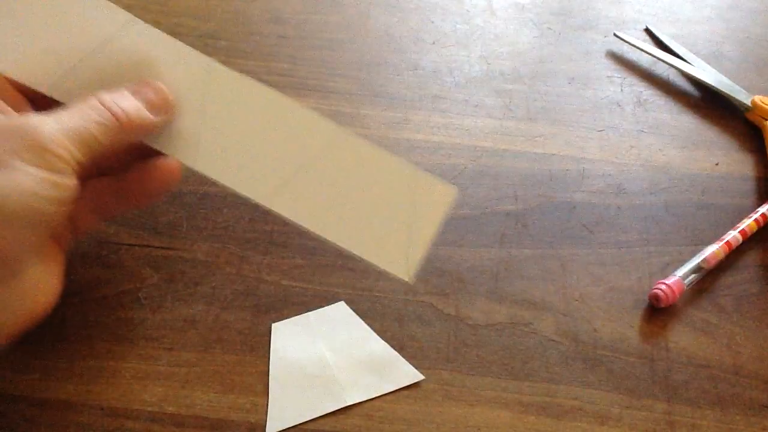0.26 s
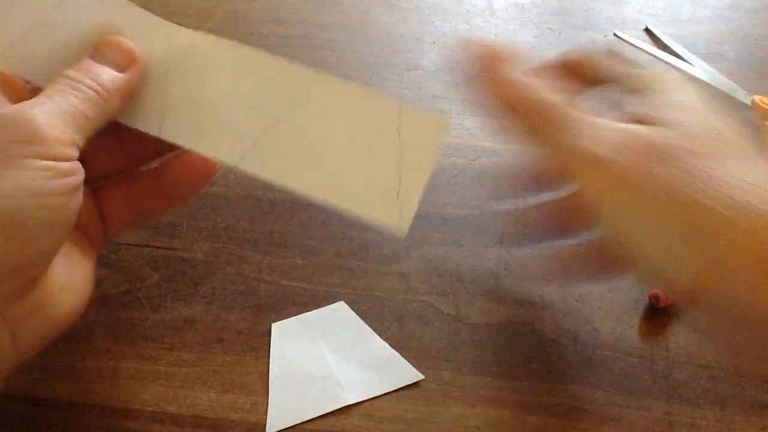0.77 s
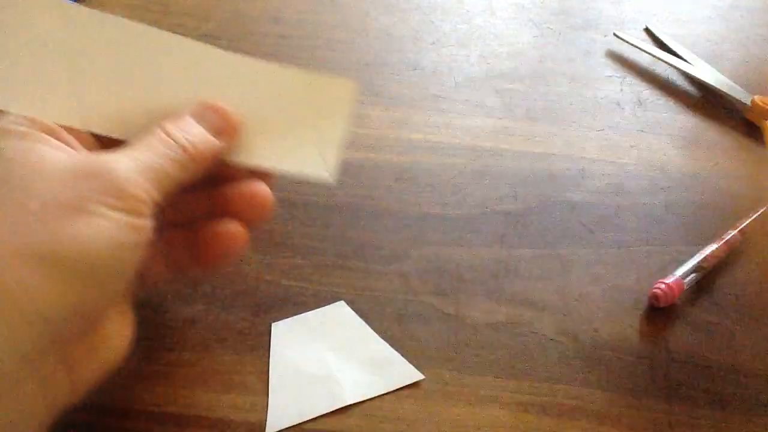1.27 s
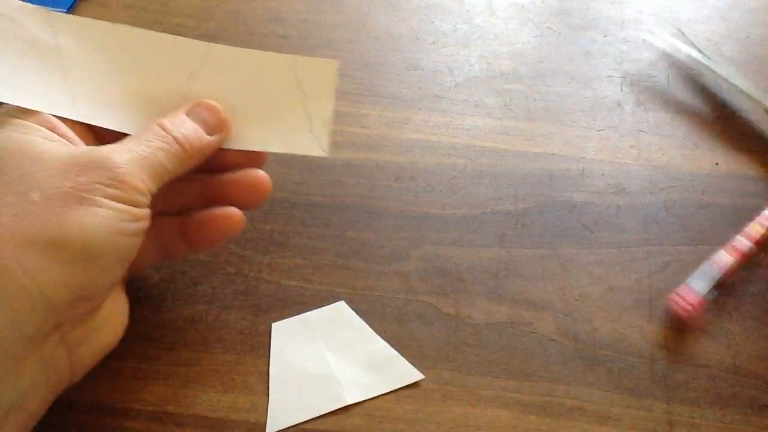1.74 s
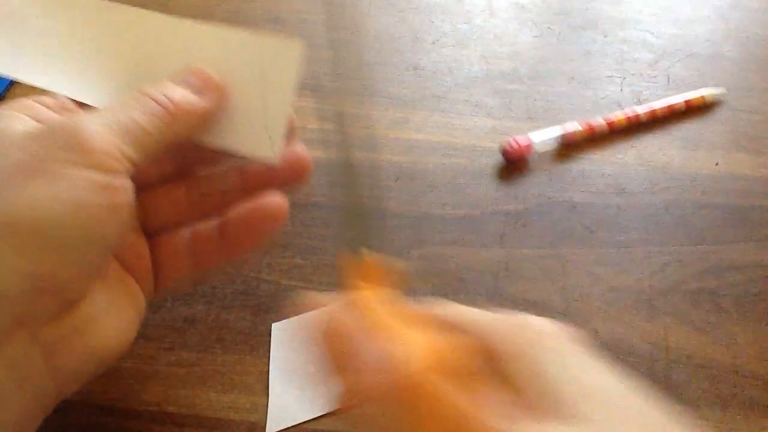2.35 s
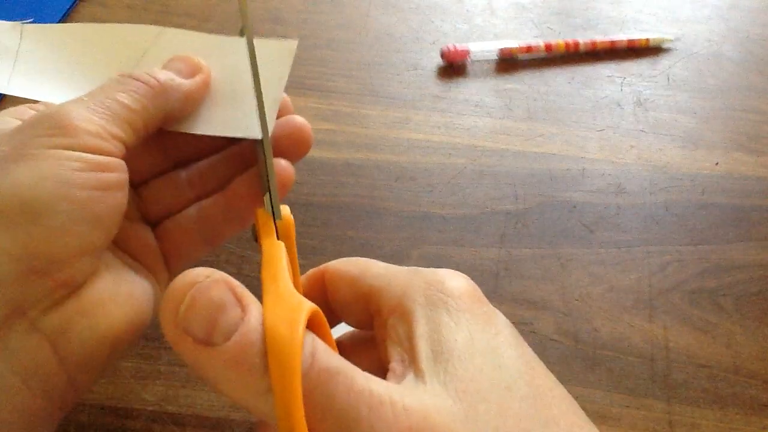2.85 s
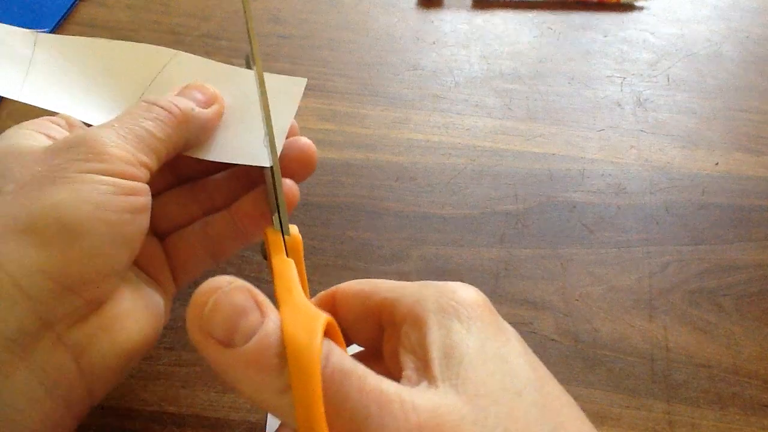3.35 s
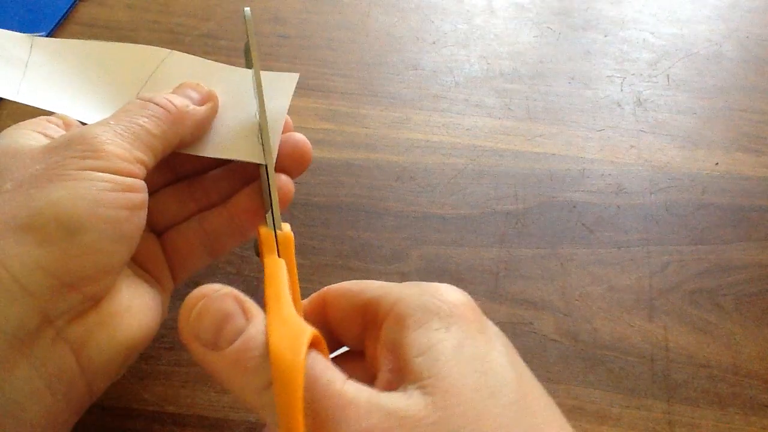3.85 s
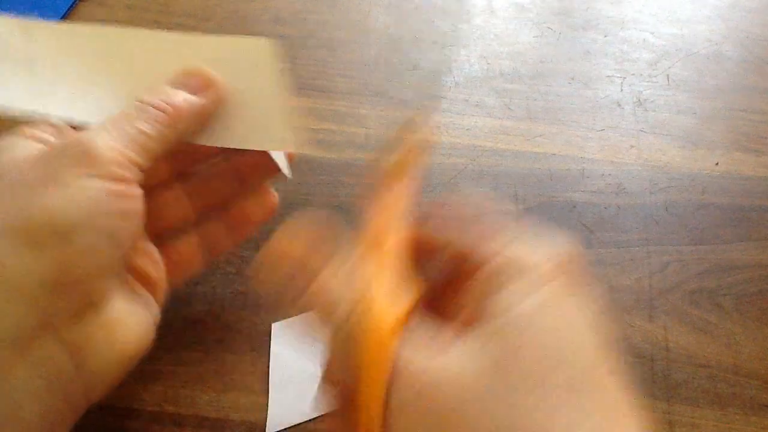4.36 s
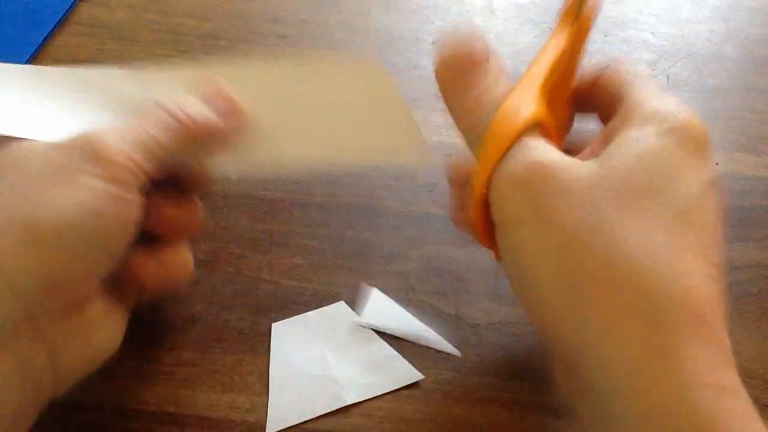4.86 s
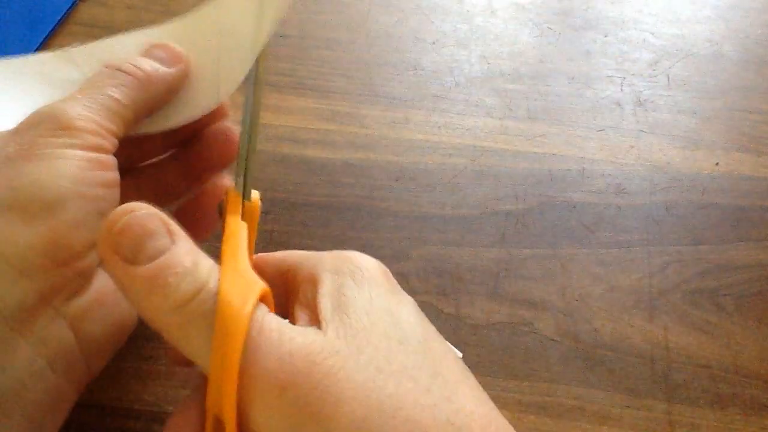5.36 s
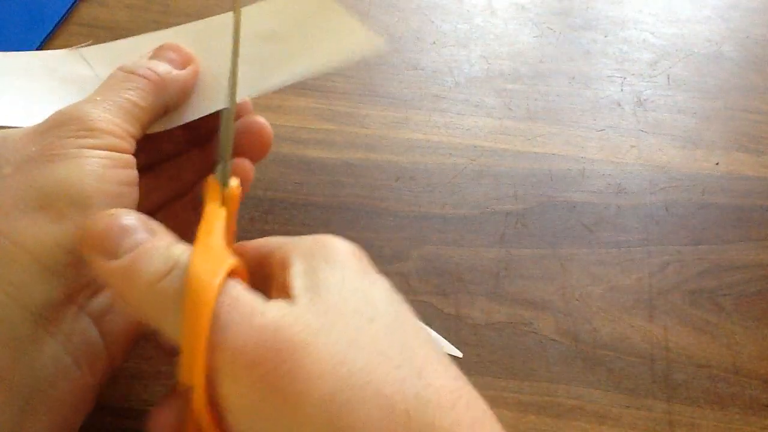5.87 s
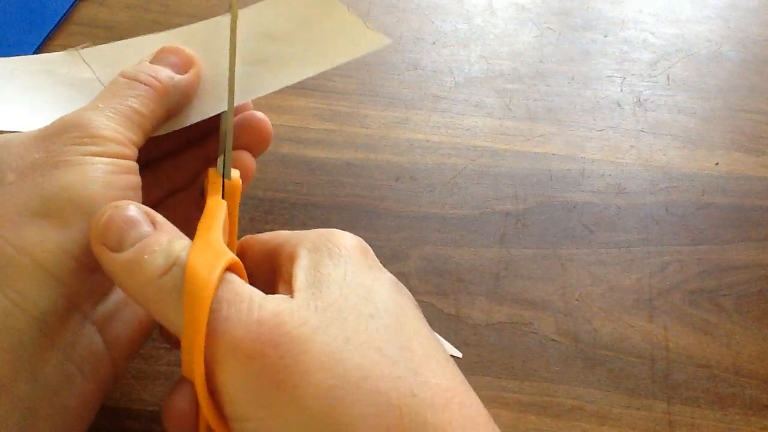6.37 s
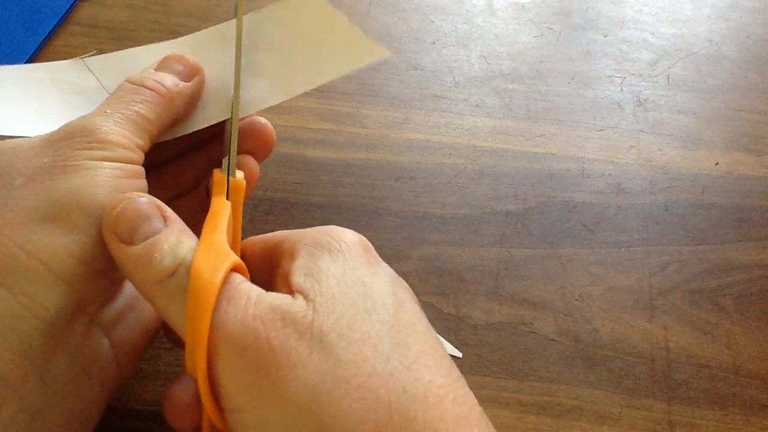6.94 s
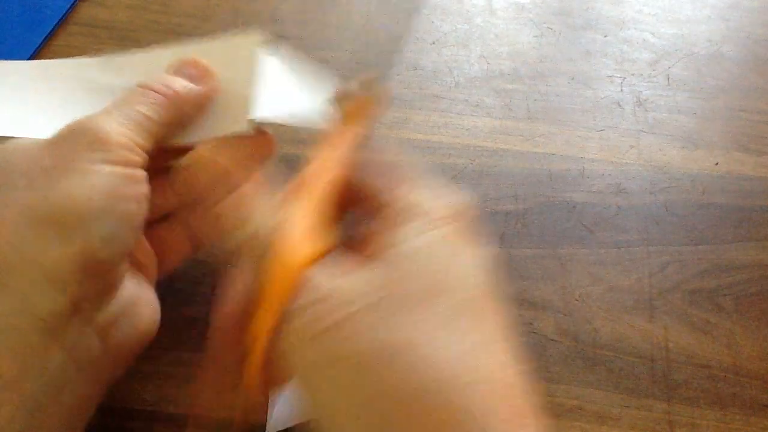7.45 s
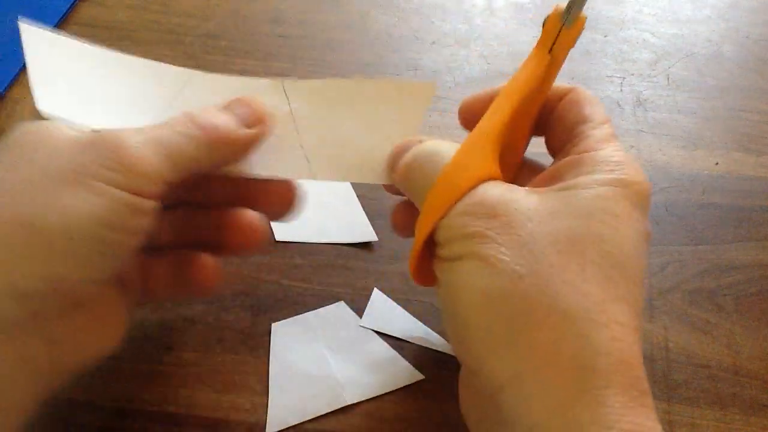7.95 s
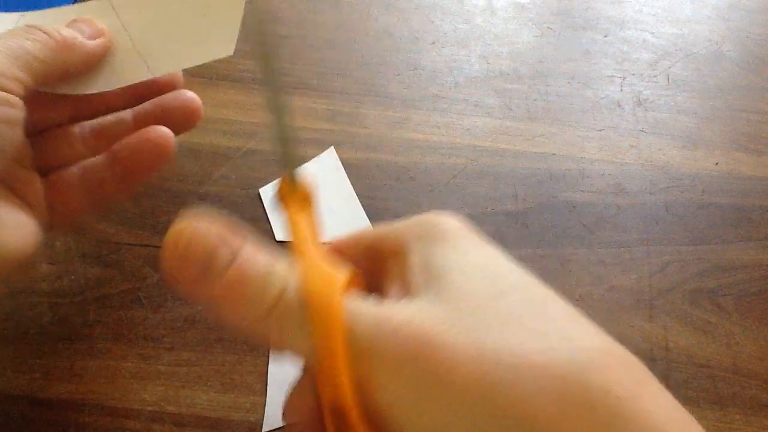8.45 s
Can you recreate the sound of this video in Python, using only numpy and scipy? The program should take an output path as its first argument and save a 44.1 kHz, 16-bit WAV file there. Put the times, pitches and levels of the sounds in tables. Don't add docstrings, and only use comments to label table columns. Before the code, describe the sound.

A close mono microphone hears a quiet room with soft ventilation, faint mains buzz and barely audible appliance drones. From 0 to 0.6 s a stiff paper strip rustles, flexes and snaps in the fingers. Around 1.0-1.2 s come short slips and two sharp knocks on the wooden table. At 1.6 s tools clack, and at 1.8 s the loudest hard, bright, metallic clatter rings the tabletop, with smaller taps and dragging until about 2.5 s. Near silence follows. From 3.6 to 4.5 s blades slowly shear paper, with thin crackles growing to a crisp hiss at 4.2 s. Soft swishes and rubbing run to 5.8 s, with a modest knock at 5.3 s. A lull, then faint crackles from 6.8 s lead to the second cut, closing at 7.28 s with a brief falling squeak and snip. Papery wipes follow, a light tick and rustle at 8.15 s, then a faint lingering hiss.

```python
import sys
import numpy as np
from scipy import signal
from scipy.fft import rfft, irfft
from scipy.io import wavfile

SR = 44100
rng = np.random.default_rng(int(sys.argv[2]) if len(sys.argv) > 2 else 0)


def rack_gain(trim_db):
    fader = np.asarray(trim_db, float)
    return 10 ** (fader / 20)


def unload_wav(signal):
    wavfile.write(
        sys.argv[1],
        SR,
        np.round(np.clip(np.atleast_2d(signal).T, -1, 1) * 32767).astype(np.int16),
    )


N = 384111

# freq_hz, density_db_per_hz
AIR_SPECTRUM = [(20, -55), (60, -34), (95, -21.5), (125, -22), (200, -8), (240, -7.5), (280, -8),
                (360, -11.5), (450, -12.5), (700, -9.5), (1150, -14), (1600, -20), (2300, -24.5),
                (15300, -28)]
AIR_DB = -59
# freq_hz, level_db_rms
HUM_LINES = [(120.1, -68.5), (240.3, -67), (360.4, -75), (630, -77)]
# time_s, level_db
BUZZ_SWELL = [(0, -4), (.5, -0.5), (1.0, 5), (2.0, 4), (2.8, 1.5), (3.2, -1.5), (5.0, -0.5), (6.0, 0),
              (7.8, -1), (8.2, -6.5), (8.71, -4)]
# time_s, level_db
RUMBLE_LEVEL = [
    (0, -60),
    (.5, -80),
    (1.401, -69.5),
    (2.6, -77),
    (6.3, -75.5),
    (6.8, -72.5),
    (7.4, -73),
    (8.71, -68),
]
# freq_hz, density_db_per_hz
FIBRE_SPECTRUM = [(880, -46.5), (1500, -23.5), (1620, -14), (1860, -3), (2260, -2.5), (3780, -3),
                  (6260, -3), (11000, -3.5), (15300, -6.5)]
# freq_hz, width_hz, level_db
SHEET_MODES = [(1200, 200, 2), (1890, 1400, -3), (741, 950, 9)]
# peak_s, rise_s, fall_s, hiss_db, colour_hz
SLIDES = [(0.0, .01, 0.17, -36, 5140), (.2, 0.4, 0.45, -51, 6700), (.334, 0.085, .15, -42.5, 3000),
          (0.38, 0.027, 0.045, -34.5, 3620), (.45, 0.14, 0.37, -46.5, 5500), (0.721, 0.1, 0.08, -51, 7340),
          (.96, 0.011, 0.037, -47.5, 6480), (1.0, 0.008, 0.04, -38.5, 6000), (1.155, .06, .05, -56, 5960),
          (1.202, 0.24, 0.039, -45, 5500), (1.32, 0.16, .25, -58, 5540), (1.492, .05, 0.072, -57.5, 5310),
          (1.595, 0.015, 0.11, -44, 4520), (1.741, .2, 0.069, -63.5, 4000), (1.8, .02, 0.6, -52, 6300),
          (1.98, 0.15, 0.17, -50.5, 5500), (2.26, 0.36, 0.23, -50, 6910), (2.396, 0.14, 0.08, -53.5, 5930)]
# peak_s, rise_s, fall_s, hiss_db, colour_hz
SHEARS = [(3.59, .16, .3, -64, 6800), (3.77, 0.18, 0.19, -54.5, 12200), (3.87, 0.25, 0.33, -52.5, 7550),
          (4.199, 0.1, 0.06, -39.5, 6700), (4.38, 0.099, 0.11, -60, 7480), (4.45, 0.14, 0.22, -48.5, 7650),
          (4.6, .016, 0.054, -52, 7000), (4.77, 0.28, 0.031, -49, 5100), (4.83, 0.099, 0.082, -44, 6630),
          (5.008, 0.17, 0.13, -47, 7700), (5.27, 0.091, 0.25, -45, 7130), (5.47, 0.071, 0.1, -43.5, 8400),
          (5.785, 0.013, 0.22, -51.5, 6300), (6.95, 0.32, 0.79, -53.5, 5430),
          (7.23, 0.21, 0.12, -44.5, 8400), (7.28, 0.096, 0.024, -38, 4250), (7.88, 0.12, 0.39, -59, 5040),
          (7.475, 0.03, 0.24, -48.5, 7800), (7.754, 0.034, 0.086, -40, 9200),
          (8.095, 0.23, 0.037, -49, 6370), (8.13, 0.013, 0.056, -39.5, 6430), (8.21, .06, 0.097, -52, 5150),
          (8.38, 0.2, 0.12, -56.5, 6500), (8.53, .03, 0.14, -62.5, 5900), (5.13, .2, 0.16, -57.5, 8000),
          (5.34, .1, .05, -49.5, 9000), (8.616, .004, 2.2, -45.5, 10400)]
# peak_s, rise_s, fall_s, body_db
BENDS = [(.086, .7, 0.055, -33.5), (.12, 0.033, 0.4, -44.5), (.334, 0.05, 0.027, -33.5),
         (.378, .06, .12, -40), (.45, .1, 0.61, -52), (.958, .012, .03, -51), (1.0, .025, .065, -55),
         (1.155, 0.088, .05, -49.5), (1.202, .05, 0.041, -39.5), (1.3, 0.11, 1.1, -63.5),
         (1.492, .04, .095, -50), (1.595, 0.014, 0.28, -37.5), (1.76, 0.23, 0.022, -58),
         (1.8, 0.019, .08, -29), (1.85, .03, .13, -37), (1.92, 0.069, 0.45, -42.5),
         (2.396, .06, 0.26, -46.5), (2.552, 0.096, 0.5, -59.5)]
# peak_s, rise_s, fall_s, body_db
FLEXES = [(3.59, .13, .36, -58.5), (3.87, .05, 1.1, -67), (4.2, 0.11, 0.057, -47), (4.35, 0.11, 0.046, -59),
          (4.45, .07, 0.18, -57), (4.6, 0.0081, 0.022, -47.5), (4.77, 0.2, .1, -53),
          (4.84, .1, 0.052, -44.5), (4.99, 0.35, 0.41, -59.5), (5.27, 0.033, 0.32, -48),
          (5.45, .2, .2, -64), (5.78, 0.022, .9, -60), (6.85, 0.47, 0.15, -61), (7.23, 0.35, .1, -52),
          (7.28, 0.12, 0.04, -43.5), (7.41, 0.069, 0.023, -61), (7.47, .025, 0.55, -56.5),
          (7.76, 0.036, 0.2, -53), (8.11, 0.57, .05, -55), (8.15, 0.082, 0.12, -50), (8.33, .01, 0.18, -54),
          (8.613, 0.0071, .045, -50.5), (8.71, 0.096, 0.085, -63)]
STROKE_SWING_DB = 20
STROKE_ROUNDNESS = 1.047
COLOUR_LIFT_DB = 5
# start_s, peak_db, deep_body_db, ring_on_db, hardness_hz
KNOCKS = [(.004, -38, -5.5, 1.5, 1200), (.170, -43, -5, 0, 1500), (.323, -27.5, -25, -5, 1500),
          (1.001, -27, -18, -9.5, 2170), (1.153, -28, -14.5, -13, 1800), (1.161, -24, -45, -17, 2580),
          (1.438, -31.5, -8, 1.5, 900), (1.582, -17.5, -10.5, -3, 2830), (1.606, -24.5, -9, 0, 2550),
          (1.7827, -11, -11.5, -4, 2520), (1.851, -23.5, -9.5, 2.5, 2645), (1.876, -27.5, -5.5, -1.5, 2030),
          (2.160, -37, -28, -13, 3020), (2.378, -34.5, -11, 2.5, 2090), (2.521, -47.5, 1.5, -1.5, 1000),
          (4.6, -40, -19, -14, 2000), (4.795, -39.5, -18, -4, 1510), (5.262, -25.5, -12.5, -4.5, 1840),
          (7.283, -27, -32.5, -20, 2670), (8.153, -29, -26, -10, 2300), (8.322, -55.5, 1, 6, 1000),
          (8.513, -51.5, 3.5, 2, 1006)]
# freq_hz, level_db, t60_s
TABLE_MODES = [(120, -14, .3), (193.5, -9.5, 0.79), (216.2, -2.5, 1.1), (300, -7, 0.4), (337, -13, 0.92),
               (486, -20.5, 0.68), (706, -14.5, 0.17), (801, -14, 0.55), (919, -13, 0.36),
               (996, -14.5, 0.092), (1232.6, -8, 0.16), (1452, -11, 0.36), (1580, -9.5, 0.25),
               (1810, -16.5, .3), (2040, -17, .3), (2260, -8, 0.2)]
# freq_hz, level_db, t60_s
CLUTTER_MODES = [(166, -12, 0.33), (243.6, -9.5, 0.54), (268.6, -14, .4), (408, -16.5, 0.45),
                 (540, -13, .4), (620, -19.5, .4), (1070, -6, .5), (1150, -13, .35), (1335, -8.5, .35),
                 (1720, -11, 0.3), (2130, -20, .5)]
# freq_hz, level_db, t60_s
TAIL_BANDS = [(171, -7, 0.43), (310, -2.5, 0.51), (1100, -1, 0.56), (1580, -7, 0.31), (2300, -9, 0.46)]
RING_FLUTTER_DB, RING_FLUTTER_HZ = 4.0, 15
# start_s, peak_db, colour_hz, colour_share_db
SNAPS = [(.0143, -15, 5000, 0), (.0165, -18, 2100, 8), (.3116, -24.5, 3630, 5.5), (.3306, -9, 7700, 0.5),
         (.3732, -14, 3980, 7), (1.1608, -11, 1150, 6.5), (1.1612, -4.5, 4500, 0), (1.4396, -28, 6400, 1),
         (1.581, -2, 9400, -2), (1.7831, 3.5, 6000, 0.5), (1.7834, 3, 10000, 1), (1.7879, -7, 7450, 5),
         (1.85, -0.5, 2270, -7), (2.161, -11, 1500, -30), (2.9722, -49.5, 9990, 9),
         (5.7743, -28, 7110, -11), (7.006, -36.5, 4600, 9), (7.0374, -39, 4390, 0),
         (7.284, -23, 3730, 10.5), (7.711, -26.5, 1280, -4), (8.1267, -18, 5410, -4),
         (8.1516, -34.5, 3170, 8.5)]
# start_s, peak_db, colour_hz, colour_share_db
FINGER_SLIPS = [(.0749, -28, 1930, 11), (.3591, -29, 1130, 7), (.3774, -26, 2300, 9.5),
                (.58, -36.5, 5530, 3), (.636, -43, 4540, 4), (.952, -40.5, 1214, 6),
                (.9965, -31, 2200, 3.5), (1.1157, -35, 1180, 0), (2.125, -37.5, 4490, -4),
                (2.3457, -44, 3320, 2.5), (2.5495, -33.5, 980, -7), (2.601, -38.5, 5480, -8),
                (3.0856, -46, 2430, -3), (3.3294, -43, 1310, -5.5), (7.398, -34.5, 5630, -10),
                (8.6143, -41, 6100, 4.5)]
# start_s, peak_db, colour_hz, colour_share_db
BLADE_SLIPS = [(3.5622, -39.5, 1000, -13), (3.6468, -45, 1070, -8), (3.7135, -47, 11800, 4),
               (3.737, -44, 11700, 5), (3.769, -42, 12000, 2), (3.891, -34, 10200, -13),
               (3.979, -46, 7960, -2), (4.0154, -46, 6400, 2), (4.0693, -33.5, 7650, -10),
               (4.117, -30, 8750, -18), (4.14, -31.5, 10600, -14), (4.1934, -25, 7060, -16),
               (4.3329, -31, 6700, -11), (4.396, -34, 10200, -15), (4.4566, -36, 7650, 1),
               (4.5205, -43, 7910, -3), (4.634, -37.5, 1100, -0.5), (4.6728, -39, 2840, -16),
               (4.7173, -33.5, 7250, -10), (4.9217, -36, 11900, 2), (5.2926, -36, 1020, -7),
               (5.4017, -37, 5940, 3), (5.4502, -29, 8240, -6.5), (5.7844, -34.5, 7060, -5),
               (7.1356, -44, 3850, -2), (7.1546, -33.5, 2020, -7), (7.170, -34, 3000, -6),
               (7.185, -32, 8000, -7), (7.212, -35, 1220, -6)]
# start_s, peak_db, colour_hz, colour_share_db
WIPES = [
    (5.214, -32.5, 8800, -14),
    (7.454, -30, 4300, -16),
    (7.624, -36, 8800, -6.5),
    (7.728, -35, 9800, 7.5),
    (7.778, -48, 1050, 8),
    (8.022, -33, 4000, -10),
    (4.797, -33, 6000, -7),
    (.556, -36.5, 5400, -0.5),
    (.29, -38, 1500, 0),
    (4.992, -33.5, 7900, -3),
]
# start_s, peak_db, colour_hz
CRACKLES = [(0.3704, -17.5, 1680), (0.4044, -29, 2590), (0.555, -34, 3860), (0.6947, -43, 7020),
            (0.8021, -53, 1280), (1.0857, -40, 1140), (1.2028, -26, 1220), (1.3149, -49, 1230),
            (1.4835, -45, 1270), (2.6455, -53, 1110), (3.686, -47, 11500), (3.7384, -39, 11700),
            (3.7638, -36, 11400), (3.7754, -41, 12200), (3.7947, -41, 9090), (3.9504, -48, 8060),
            (3.9802, -41, 8160), (4.017, -41, 6350), (4.053, -45, 7700), (4.3665, -46, 6070),
            (4.5211, -45, 7910), (4.7337, -40, 2630), (4.8044, -34, 4160), (4.8794, -41, 1164),
            (4.9274, -39, 10100), (5.3514, -39, 1040), (6.776, -49, 1930), (6.8184, -46, 5150),
            (6.8738, -49, 5070), (6.9004, -44.5, 6200), (6.9521, -41, 4930), (7.1127, -41, 4030),
            (7.1367, -40, 4030), (7.216, -31, 1210), (7.3044, -36, 3950), (7.3244, -48, 1100),
            (7.5614, -44, 3190), (7.601, -41.5, 1310), (8.0854, -39, 5780), (8.2074, -42, 13600),
            (8.3095, -52, 1640), (8.322, -46, 1030), (8.405, -44, 7470), (8.519, -51, 1080)]
# middle_s, length_s, freq_hz, width_hz, level_db
DRONES = [
    (6.88, 0.66, 181, 5.7, -70.5),
    (7.8, 2, 625, 9.5, -73),
    (7.34, 3, 545, 30, -73),
    (7.9, 0.73, 320, 30, -69),
    (0.72, 0.59, 1240, 150, -69.5),
    (3.62, .3, 182, 18, -72),
    (2.82, .4, 756, 120, -70.5),
    (8.55, .5, 270, 20, -68),
]
# start_s, length_s, level_db, from_hz, to_hz, width_hz
ZIPS = [
    (7.185, 0.089, -49, 1500, 950, 200),
    (4.725, 0.055, -48.5, 3600, 2700, 990),
    (5.4, 0.026, -55, 6800, 4900, 800),
]
# delay_s, level_db
ECHOES = [(.0055, -15), (0.012, -22)]


def rms_one(x):
    return x / np.sqrt(np.mean(x ** 2) + 1e-20)


def drift(rate_hz):
    r = np.exp(-2 * np.pi * rate_hz * 40 / SR)
    noise = rng.standard_normal(N // 40 + 2002)
    slow = signal.lfilter([1], [1, -2 * r, r * r], noise)[2000:]
    return np.interp(np.arange(N) / 40, np.arange(len(slow)), rms_one(slow))


def filtered(x, order, hz, kind):
    return signal.sosfilt(signal.butter(order, hz, kind, fs=SR, output="sos"), x)


def resonance(x, hz, width_hz):
    r = np.exp(-np.pi * width_hz / SR)
    zeros = np.array([1, 0, -1]) * (1 - r * r) / 2
    return signal.lfilter(zeros, [1, -2 * r * np.cos(2 * np.pi * hz / SR), r * r], x)


def coloured(x, spectrum):
    hz, db = np.transpose(spectrum)
    grid_hz = np.maximum(np.fft.rfftfreq(len(x), 1 / SR), 1)
    gain = rack_gain(np.interp(np.log(grid_hz), np.log(hz), db))
    return rms_one(irfft(rfft(x) * gain, len(x)))


def grains(per_s, spread_db):
    sizes = rack_gain(spread_db * np.minimum(rng.exponential(1, N), 4)) * rng.choice([-1, 1], N)
    return sizes * (rng.random(N) < per_s / SR) + 1e-9


def add(out, piece, start_s):
    i = int(start_s * SR)
    out[i:i + len(piece)] += piece[:N - i]


def swells(peak_s, rise_s, fall_s, db):
    late_s = np.arange(N // 44 + 2) * 44 / SR - peak_s[:, None]
    rise_s = np.maximum(rise_s, .004)[:, None]
    fall_s = np.maximum(fall_s, .004)[:, None]
    slope = np.where(late_s < 0, -late_s / rise_s, late_s / fall_s)
    level_db = db[:, None] - STROKE_SWING_DB * slope ** STROKE_ROUNDNESS
    return rack_gain(2 * np.maximum(level_db, -150))


def per_sample(coarse):
    return np.interp(np.arange(N) / 44, np.arange(len(coarse)), coarse)


def room_tone():
    t = np.arange(N) / SR
    wander = .3 * drift(2)
    lines = []
    for hz, db in HUM_LINES:
        level = np.sqrt(2) * rack_gain(db + 1.0 * drift(2.2))
        lines.append(level * np.sin(hz * (2 * np.pi * t + wander / 120)))
    hum = sum(lines[1:]) + lines[0] * rack_gain(np.interp(t, *np.transpose(BUZZ_SWELL)))
    air = coloured(rng.standard_normal(N), AIR_SPECTRUM)
    murmur = sum(.3 * drift(1.5) * resonance(air, hz, .35 * hz) for hz in np.geomspace(160, 1000, 7))
    return rack_gain(AIR_DB - 3.5 + 0.43 * drift(0.55)) * (air + murmur) + hum


def rumble():
    time_s, db = np.transpose(RUMBLE_LEVEL)
    low = filtered(rng.standard_normal(N), 3, [120, 230], "band")
    lumps_db = 2.5 * drift(6)
    return rack_gain(np.interp(np.arange(N) / SR, time_s, db) + lumps_db) * rms_one(low)


def fibre_hiss():
    *shape, stroke_hz = np.transpose(SLIDES + SHEARS)
    strokes = swells(*shape)
    total = strokes.sum(axis=0)
    pressure = per_sample(np.sqrt(total))
    colour_hz = per_sample(np.exp(np.log(stroke_hz) @ strokes / total))
    fibres = coloured(grains(5000, spread_db=2.5), FIBRE_SPECTRUM)
    edges_hz = np.geomspace(1500, 17000, 13)
    hiss, power = 0, 0
    for low, high in zip(edges_hz, edges_hz[1:]):
        nearness = np.exp(-(np.log(colour_hz / np.sqrt(low * high)) / 0.68) ** 2)
        gain = rack_gain(COLOUR_LIFT_DB * nearness)
        band = filtered(fibres, 2, [low, high], "band")
        patch = rack_gain(1.3 * drift(40))
        hiss = hiss + gain * patch * band
        power = power + gain ** 2 * np.mean(band ** 2)
    return pressure * rack_gain(4.5) * hiss / np.sqrt(power)


def sheet_boom():
    bending = per_sample(np.sqrt(swells(*np.transpose(BENDS + FLEXES)).sum(axis=0)))
    catches = grains(2500, spread_db=2.0)
    body = np.zeros(N)
    for k, (hz, width_hz, db) in enumerate(SHEET_MODES):
        body += (-1) ** k * rack_gain(db) * resonance(catches, hz, width_hz)
    body += sum(resonance(catches, hz, 35) for hz, db, t60 in TABLE_MODES if hz > 700)
    return bending * rack_gain(-7.0) * rms_one(filtered(body, 2, 150, "high"))


def rubbing():
    clumps_db = 1.53 * drift(32) + 0.99 * drift(150)
    return rack_gain(clumps_db) * (fibre_hiss() + sheet_boom())


def knocks():
    out, t = np.zeros(N), np.arange(SR) / SR
    modes = TABLE_MODES + CLUTTER_MODES
    chance = rng.standard_normal((len(KNOCKS), 2, len(modes)))
    wood = rng.standard_normal(len(t))
    tail = sum(rack_gain(db - 60 * t / t60) * rms_one(resonance(wood, hz, 0.46 * hz)) for hz, db, t60 in TAIL_BANDS)
    rings = []
    for hz, db, t60 in modes:
        flutter_db = RING_FLUTTER_DB * drift(RING_FLUTTER_HZ)[:SR] * min(1, 650 / hz)
        rings.append(rack_gain(db - 60 * t / t60 + flutter_db) * np.sin(2 * np.pi * hz * t))
    rings = np.array(rings)
    thud = rms_one(resonance(wood, 1200, 2050)) * rack_gain(-60 * t / 0.035)
    first_push = np.sin(2 * np.pi * 335 * t) + 0.51 * np.sin(2 * np.pi * 170 * t)
    thud += 0.94 * first_push * rack_gain(-60 * t / 0.032)
    for (start_s, db, deep_db, ring_db, hardness_hz), luck in zip(KNOCKS, chance):
        struck = rack_gain(2 * luck[0]) * np.sign(luck[1]) @ rings
        body = rack_gain(ring_db - 15.5) * (struck + rack_gain(-10.5) * tail) + rack_gain(-6.5) * thud
        upper = filtered(body, 3, [480, hardness_hz], "band")
        deep = filtered(body, 2, [125, 450], "band")
        add(out, rack_gain(db) * (upper + rack_gain(deep_db + 10.5) * deep), start_s)
    return filtered(out, 4, 100, "high")


def puffs(events, rise_s, t60_s, level_db, roundness):
    out, t = np.zeros(N), np.arange(SR // 8) / SR
    noise = rng.standard_normal((len(events), len(t)))
    decay_db = -60 * (np.maximum(t - rise_s, 0) / t60_s) ** roundness
    shape = np.sin(np.pi / 2 * np.minimum(t / rise_s, 1)) * rack_gain(decay_db)
    for (start_s, db, hz, colour_db), crackle in zip(events, noise):
        tint = rms_one(resonance(crackle, min(hz, 15e3), 0.28 * hz))
        broad = filtered(crackle, 2, 900 + 0.19 * hz, "high")
        add(out, rack_gain(db + level_db) * shape * (broad + rack_gain(colour_db) * tint), start_s)
    return out


def snaps():
    return puffs(SNAPS, 0.00029, 0.01, level_db=-15.5, roundness=0.9)


def slips():
    fingers = puffs(FINGER_SLIPS, 0.0038, 0.03, level_db=-14.0, roundness=1.58)
    blades = puffs(BLADE_SLIPS, 0.0033, 0.025, level_db=-14.0, roundness=2.0)
    wipes = puffs(WIPES, 0.013, 0.045, level_db=-15.5, roundness=2.4)
    return fingers + blades + wipes


def crackles():
    events = [(*row, 3.0) for row in CRACKLES]
    return puffs(events, .0006, 0.014, level_db=-12.5, roundness=1.1)


def drones():
    out, t = np.zeros(N), np.arange(N) / SR
    noise = rng.standard_normal(N)
    for middle_s, length_s, hz, width_hz, db in DRONES:
        swell = np.exp(-((t - middle_s) / (.5 * length_s)) ** 4)
        line = resonance(resonance(noise, hz, width_hz), hz, width_hz)
        out += rack_gain(db) * swell * rms_one(line)
    return out


def zips():
    out, t = np.zeros(N), np.arange(SR // 8) / SR
    noise = rng.standard_normal((len(ZIPS), 3, len(t)))
    for (start_s, length_s, db, from_hz, to_hz, width_hz), (a, b, c) in zip(ZIPS, noise):
        part = np.minimum(t / length_s, 1)
        phase = 2 * np.pi * np.cumsum(from_hz * (to_hz / from_hz) ** part) / SR
        a, b = filtered([a, b], 2, width_hz / 2, "low")
        stutter = rack_gain(2.5 * rms_one(resonance(c, 61, 60)))
        squeak = rms_one(stutter * (a * np.cos(phase) + b * np.sin(phase)))
        add(out, rack_gain(db) * np.sin(np.pi * part) * squeak, start_s)
    return out


def reflections(x):
    t = np.arange(SR // 3) / SR
    wash = filtered(rng.standard_normal(len(t)), 1, 6000, "low")
    response = rack_gain(-40.5 - 60 * t / 0.49) * wash
    for delay_s, db in ECHOES:
        response[int(delay_s * SR)] += rack_gain(db)
    return x + signal.fftconvolve(x, response)[:N]


def scene():
    ticks = snaps() + slips() + crackles() + zips()
    mix = room_tone() + rumble() + rubbing() + knocks() + reflections(ticks) + drones()
    return mix[None]


def roll_off(x):
    return signal.sosfilt(signal.butter(12, 16510, fs=SR, output="sos"), x)


def record(dry):
    top = signal.cheby2(12, 40, 15650, fs=SR, output="sos")
    return roll_off(signal.sosfilt(top, dry))


dry = scene()
out = record(dry)
unload_wav(out)
```